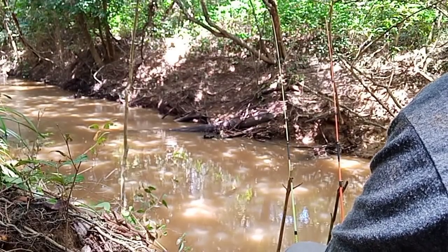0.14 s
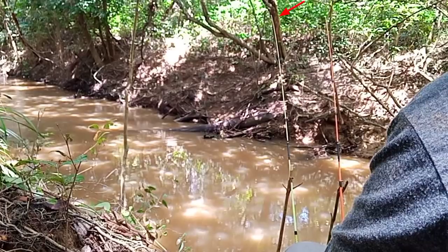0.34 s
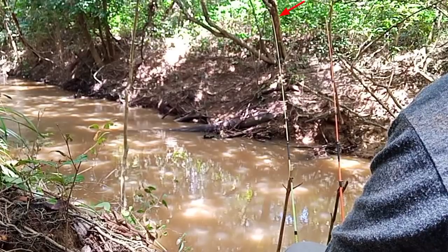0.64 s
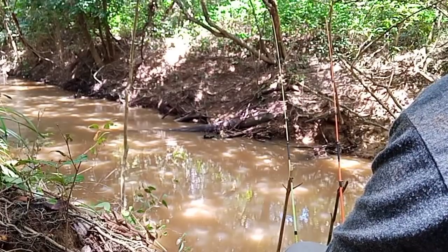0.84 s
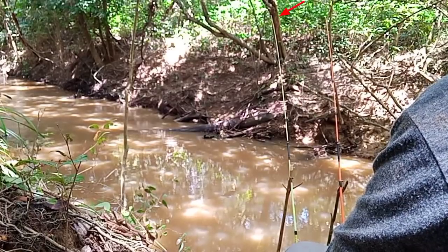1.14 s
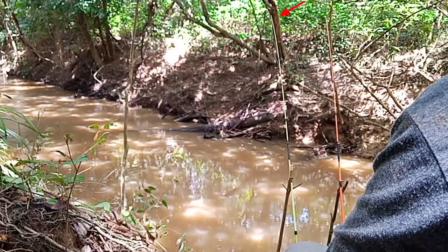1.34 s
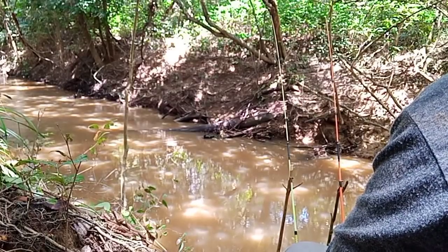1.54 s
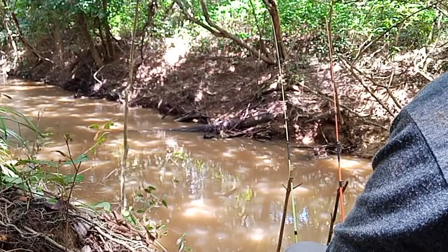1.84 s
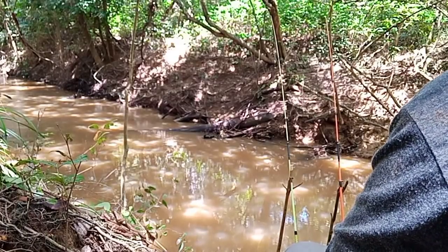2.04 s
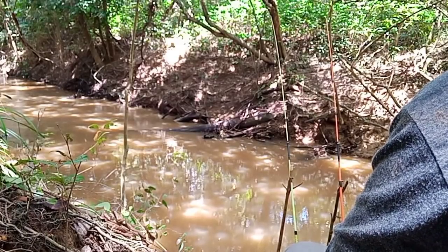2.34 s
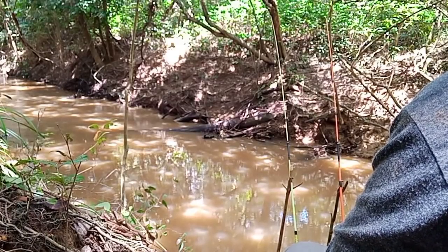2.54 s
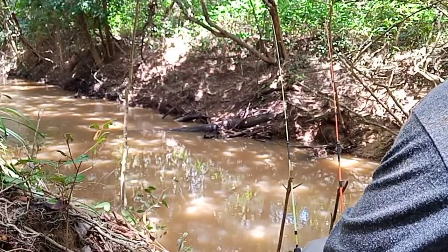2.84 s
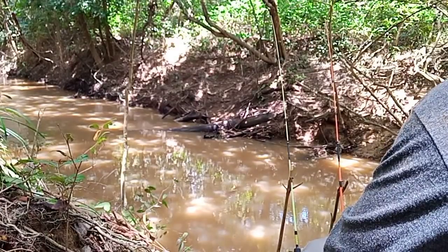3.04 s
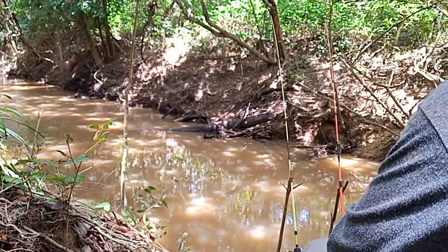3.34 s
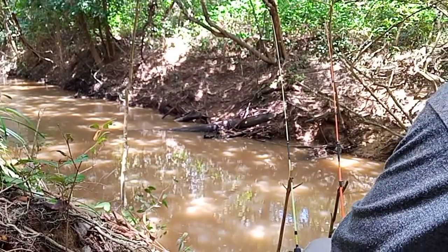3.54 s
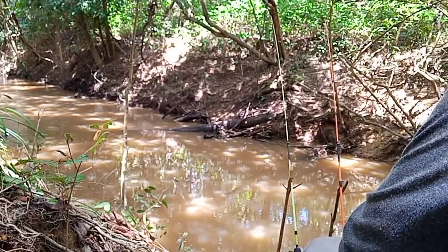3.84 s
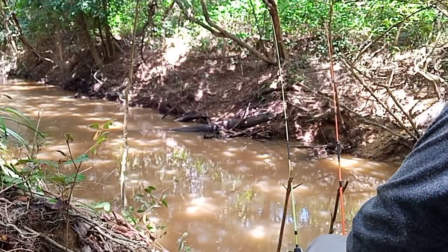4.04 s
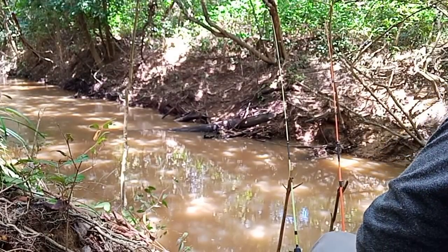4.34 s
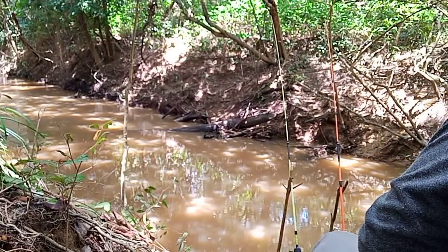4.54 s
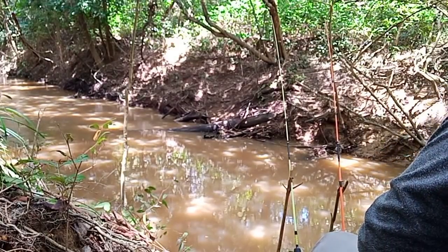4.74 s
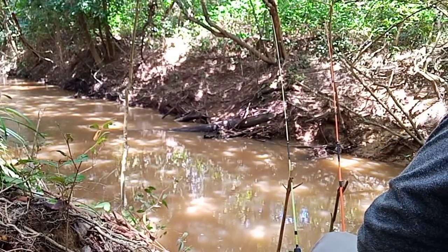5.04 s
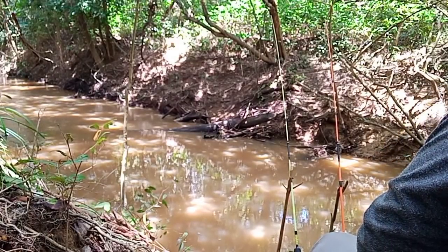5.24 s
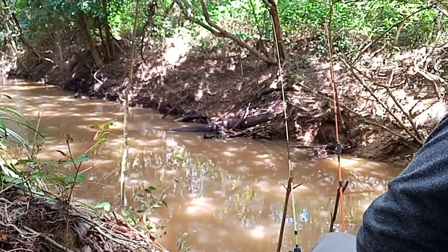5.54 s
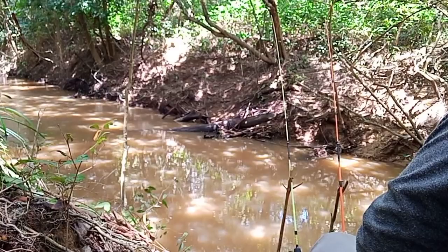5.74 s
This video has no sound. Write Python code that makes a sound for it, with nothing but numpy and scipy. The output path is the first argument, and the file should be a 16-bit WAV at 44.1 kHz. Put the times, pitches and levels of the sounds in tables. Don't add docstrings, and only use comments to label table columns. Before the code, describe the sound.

Dense, high-pitched cicada buzzing dominates from the start, dry and close, with a far chorus blurring behind it. The steady wall sags slightly, breaks into quick rasping bursts near the middle, passes between singers with short abruptly cut swells, then settles into an unbroken shrill drone to the end. Barely audible water hiss, small drips and one twig click. Mono outdoor camera sound beneath trees.

```python
import sys
import numpy as np
from scipy import signal
from scipy.fft import rfft, irfft, next_fast_len
from scipy.io import wavfile
from scipy.ndimage import uniform_filter1d, map_coordinates

SR = 44100
rng = np.random.default_rng(int(sys.argv[2]) if len(sys.argv) > 2 else 0)


def amplitude_ratio(level_db):
    exponent = np.asarray(level_db, float) / 20
    return 10 ** exponent


def waveform_to_disk(signal):
    frames = np.transpose(np.atleast_2d(signal))
    scaled = np.clip(frames, -1, 1) * 32767
    samples = np.round(scaled).astype(np.int16)
    wavfile.write(sys.argv[1], SR, samples)


N = 259308

# frequency in Hz, gain in dB per Hz.
BELLIES = [
    [(1530, -71), (2600, -26.5), (2700, -25), (2910, -14), (2990, -2), (3330, -1.5), (3840, -10.5),
     (4490, -31.5), (4770, -28), (5100, -28), (6630, -60), (11200, -120)],
    [(1530, -60), (2600, -25.5), (3180, -7.5), (3220, 6), (3330, 2), (3460, 4), (3810, -20.5),
     (4070, -30.5), (4810, -24), (5100, -26), (6630, -51), (11200, -120)],
    [(1530, -66), (2600, -27), (2840, -29), (2930, -6), (3330, 3), (3420, 0), (3810, -5), (4260, -17.5),
     (4610, -22), (5100, -32.5), (6630, -67), (11200, -120)],
]
# frequency in Hz, gain in dB per Hz.
RINGS_FIRST = [
    [(8000, -2), (8400, -6), (8800, -3), (9200, -3), (9600, 0), (9900, -5), (10200, -8), (10600, -12),
     (11000, -15), (11300, -14)],
    [(10800, -28), (11200, -30), (11500, -27), (11800, -22), (12100, -13), (12400, -6), (12600, -1),
     (12850, 0), (13100, -1), (13300, -7), (13550, -9), (13800, -11), (14000, -14)],
    [(13600, -3), (13900, -6), (14200, -5), (14500, -3), (14800, -4), (15100, -3), (15350, 0), (15500, -1)],
]
RINGS_SECOND = [
    [(8000, 0), (8400, -7), (8800, -8), (9200, -3), (9600, -7), (9900, -9), (10200, -14), (10600, -16),
     (11000, -17), (11300, -14)],
    [(10800, -26), (11200, -26), (11500, -17), (11800, -15), (12100, -11), (12400, -9), (12600, -6),
     (12850, -3), (13100, 0), (13300, -2), (13550, -8), (13800, -13), (14000, -12)],
    [(13600, -4), (13900, -7), (14200, -4), (14500, -3), (14800, 0), (15100, -1), (15350, 0), (15500, -3)],
]
RINGS_THIRD = [
    [(8000, 0), (8400, -6), (8800, -5), (9200, -3), (9600, -1), (9900, -1), (10200, -10), (10600, -9),
     (11000, -13), (11300, -13)],
    [(10800, -30), (11200, -32), (11500, -29), (11800, -26), (12100, -19), (12400, -15), (12600, -5),
     (12850, -3), (13100, 0), (13300, -5), (13550, -7), (13800, -10), (14000, -12)],
    [(13600, -3), (13900, -7), (14200, -5), (14500, -2), (14800, 0), (15100, -7), (15350, -5), (15500, -6)],
]
RINGS = [RINGS_FIRST, RINGS_SECOND, RINGS_THIRD]
EDGES_HZ = (8300, 11000, 13800, 17000)
# frequency in Hz, width in Hz, height over the colour in dB.
LINES_OF = [
    [(3100, 25, 4), (3240, 20, 4), (3330, 30, 5), (8800, 22, 9), (9165, 25, 5), (9630, 30, 6),
     (12550, 25, 5), (12750, 25, 4), (12865, 20, 4), (12960, 30, 6), (13180, 25, 5), (15417, 25, 8)],
    [(3310, 40, 5), (9200, 60, 4), (11600, 200, 3), (12230, 40, 3), (13100, 80, 3), (15417, 25, 6)],
    [(3025, 25, 4), (3316, 25, 6), (3552, 25, 4), (4200, 60, 3), (9830, 60, 8), (12230, 30, 7),
     (12660, 25, 6), (13070, 40, 6), (14350, 30, 4), (14825, 25, 5), (15417, 25, 7)],
]
# clicks per second, throbs per second, throb depth in dB, left-right unevenness in dB.
BEATS = [
    (187.6, 27, 1, -1.2),
    (226.7, 36, 1.1, 1),
    (238.8, 21, 0, 0.45),
]
# belly, third ring, fourth ring and top ring, all in dB.
VOICES = [
    (-43, -41.5, -26, -30),
    (-48.5, -47, -35, -36),
    (-39.5, -40.5, -25, -26.5),
]
# start in seconds, end in seconds, level at start and at end in dB.
PHRASES = [
    [(-.2, 2.56, 1.6, -1.6), (2.56, 2.81, -0.8, -3)],
    [(-.2, 2.6, -3, -11), (2.6, 2.99, -5, -1.5), (2.99, 3.93, 1, 1)],
    [(-.2, 2.6, -6, -13), (2.79, 3.3, -12, -13), (3.3, 3.9, -13, -6), (3.9, 5.05, -4.5, 0),
     (5.05, 6.2, 0, 0)],
]
# peak in seconds, build-up in seconds, level in dB.
SURGES = [
    [(3.17, 0.028, 0.5), (3.61, 0.066, 1), (4.02, 0.063, -3)],
    [(3.14, 0.045, -6), (3.5, .06, -8)],
    [(3.15, 0.036, -8), (3.49, .05, -15), (4.055, 0.093, -2.5), (4.42, 0.11, -0.5)],
]
SURGE_RINGS_DB = (-3, -7, -2.5, -3)
RINGS_FOLLOW = (0.96, 0.68, 1.03, 1.8)


def singers():
    out = np.zeros(N)
    gains = [stutter(), 1, 1]
    insects = zip(VOICES, PHRASES, SURGES, gains, BEATS, BELLIES, RINGS, LINES_OF)
    for voice, phrases, surges, gain, beat, belly, rings, lines in insects:
        drive = foliage(tymbals(*beat), wet_db=-10, t60=.15)
        upper = [ring(points, low, high, lines) for points, low, high in zip(rings, EDGES_HZ, EDGES_HZ[1:])]
        bands = filtered(drive, ring(belly, 2530, 5400, lines), *upper)
        held_power = held(phrases) ** np.reshape(RINGS_FOLLOW, (-1, 1))
        surge_power = np.outer(amplitude_ratio(SURGE_RINGS_DB) ** 2, surging(surges))
        level = amplitude_ratio(voice)[:, None] * np.sqrt(held_power + surge_power)
        out += gain * np.sum(level * bands, axis=0)
    return out


def tymbals(rate, throb, throb_db, uneven_db, drift=.012, sharp=0.4, clean=0.06):
    wander = wobble(5)
    cycle = np.cumsum(rate * (1 + drift * wander)) / SR
    clicks = np.diff(np.floor(cycle), prepend=0) * np.sqrt(SR / rate)
    rattle = rng.standard_normal(N) * np.exp(sharp * (.5 - cycle % 1))
    beat = np.cumsum(throb * (1 + 0.055 * wander)) / SR
    side = np.sign(cycle % 2 - 1)
    strength_db = uneven_db * side + throb_db * np.sin(2 * np.pi * beat)
    return (clean * clicks + rattle) * amplitude_ratio(strength_db)


def held(phrases):
    t = np.arange(N) / SR
    edge_s = 0.018
    power = np.zeros(N)
    for start, end, start_db, end_db in phrases:
        level_db = np.interp(t, (start, end), (start_db, end_db))
        power += amplitude_ratio(2 * level_db) * step(t, start, edge_s) * (1 - step(t, end, edge_s))
    return power


def surging(surges):
    t = np.arange(N) / SR
    power = np.zeros(N)
    for peak, rise, db in surges:
        width = rise * np.where(t > peak, 0.24, 1)
        power += amplitude_ratio(2 * db) * np.exp(-((t - peak) / width) ** 2)
    return power


# start in seconds, bursts per second, depth in dB, time of a burst in seconds.
STUTTER = (2.595, 25, 3.1, 2.642)


def stutter():
    t = np.arange(N) / SR
    start, rate, depth_db, peak = STUTTER
    song_end = PHRASES[0][-1][1]
    dip_db = depth_db * (np.cos(2 * np.pi * rate * (t - peak)) - 1)
    return amplitude_ratio(dip_db * step(t, start, 0.0092) * (t < song_end + .1))


# frequency in Hz, gain in dB per Hz.
DRONE = [(3030, -70), (5150, -44.5), (5820, -15), (6190, -2), (6470, 1.5), (7310, -3), (8390, -21.5),
         (9000, -32), (11700, -50), (19800, -120)]
# centre in seconds, half width in seconds, depth in dB.
LULLS = [(2.63, 0.024, -2), (3.85, .05, -0.1), (4.25, .035, -1.5), (5.9, 0.018, -3)]


def chorus(count=4):
    crowd = np.zeros(N)
    for rate, throb in rng.uniform((150, 15), (260, 35), (count, 2)):
        crowd += tymbals(rate, throb, 0.75, 1.0, clean=0.044)
    far = foliage(crowd, wet_db=-13.0, t60=0.041)
    drone, deeper = filtered(far, ring(DRONE, 5170, EDGES_HZ[0]), ring(DRONE, 5190, 6010))
    thins = step(np.arange(N) / SR, 2.59, .03)
    level_db = -24 - 1.98 * thins + bumps(LULLS) + 0.46 * wobble(8)
    return amplitude_ratio(level_db) * (drone + thins * amplitude_ratio(-24) * deeper)


# start in seconds, peak in dB, frequency in Hz, 60 dB decay in seconds.
DRIPS = [(.145, -62, 1180, .04), (.16, -55, 590, .07), (.235, -54, 1850, .1), (.42, -52, 580, .07),
         (.44, -60, 1450, .06), (.49, -56, 570, .06), (.745, -56, 640, .06), (2.648, -52, 300, .04),
         (2.66, -51, 220, .05), (2.658, -55, 1000, .06), (2.68, -59, 1020, .05), (2.815, -55, 220, .04),
         (3.778, -56, 330, .08), (3.797, -54, 340, .06), (3.9, -59, 170, .05), (3.931, -52, 430, .03),
         (3.942, -53, 280, .035), (4.13, -62, 1400, .04), (4.914, -44, 4450, .02), (4.914, -44, 4850, .02),
         (4.914, -43, 5250, .02), (4.914, -61, 1500, .03)]
# start in seconds, peak in dB.
TICKS = [
    (3.922, -29),
    (3.936, -65),
]
# frequency in Hz, level in dB, 60 dB decay in seconds.
TWIG = [(200, -15, .04), (660, -3, .026), (1390, 0, .023), (1560, -1, .02), (2100, -2, .013),
        (4700, -4, .012)]


def small_sounds():
    track = np.zeros(N + SR)
    for s, db, hz, t60 in DRIPS:
        add_mode(track, s, db, hz, t60, attack=t60 / 20)
    for s, db in TICKS:
        for hz, level_db, t60 in TWIG:
            add_mode(track, s, db + level_db - 2, hz, t60, attack=0.0019)
    return track[:N]


def add_mode(track, s, db, hz, t60, attack):
    t = np.arange(SR // 8) / SR
    envelope = amplitude_ratio(db - 60 * t / t60) * (1 - np.exp(-t / attack))
    track[round(s * SR):][:len(t)] += envelope * np.sin(2 * np.pi * hz * t)


# frequency in Hz, gain in dB per Hz.
HISS = [(12, -27), (20, 16), (22, -15), (138, -4), (266, -8.5), (306, -9.5), (706, -11), (1110, -13),
        (2160, -12), (2600, 3.5), (3380, -36), (5720, -120)]


def hiss():
    colour = HISS[:-3] + [(2450, -11), (2620, -17), (3500, -15), (6000, -15), (16000, -30)]
    bed, = filtered(rng.standard_normal(N), lambda hz: along(colour, hz))
    uneven = rng.standard_normal(N) * amplitude_ratio(2 * wobble(9.6))
    lumps, = filtered(uneven, ring([(100, 0)], 80, 340))
    floor_db = -64.5 - .15 * np.arange(N) / SR
    return amplitude_ratio(floor_db) * (bed + amplitude_ratio(-14) * lumps)


def foliage(x, wet_db, t60):
    t = np.arange(SR // 5) / SR
    tail = rng.standard_normal(len(t)) * amplitude_ratio(-60 * t / t60)
    return x + amplitude_ratio(wet_db) * signal.fftconvolve(x, tail / np.linalg.norm(tail))[:N]


def ring(points, low, high, lines=()):
    def response(hz):
        sharp_db = sum(db / (1 + ((hz - centre) / width) ** 2) for centre, width, db in lines)
        band = step(hz, low, 150) * (1 - step(hz, high, 150))
        return along(points, hz) * amplitude_ratio(sharp_db) * band
    return response


def filtered(x, *responses):
    m = next_fast_len(N + 8192)
    spectrum, hz = rfft(x, m), np.fft.rfftfreq(m, 1 / SR)
    return [unit(irfft(spectrum * response(hz), m)[:N]) for response in responses]


def unit(x):
    return x / np.sqrt(np.mean(x ** 2) + 1e-20)


def along(points, hz):
    f, db = np.transpose(points)
    return amplitude_ratio(np.interp(np.log(hz + 1), np.log(f + 1), db))


def wobble(rate):
    knots = rng.standard_normal(int(N * rate / SR) + 4)
    return map_coordinates(knots, [np.arange(N) * rate / SR])


def step(v, edge, width):
    return .5 + .5 * np.tanh((v - edge) / width)


def bumps(rows):
    t = np.arange(N) / SR
    return sum(size * np.exp(-((t - s) / width) ** 2) for s, width, size in rows)


def scene():
    return np.tile(singers() + chorus() + hiss() + small_sounds(), (2, 1))


# frequency in Hz, level in dB per bin.
MASKED = [(400, -113), (900, -98), (2200, -96.5), (2620, -90.5), (3000, -93), (4500, -91), (4850, -88.5),
          (5150, -88), (6000, -103)]


def without_masked(x):
    hz, _, z = signal.stft(x, SR, nperseg=2048)
    power = uniform_filter1d(uniform_filter1d(np.abs(z) ** 2, size=3, axis=0), size=2, axis=1)
    frame = np.minimum(np.arange(z.shape[1]), N // 1024)
    demand = amplitude_ratio(2.2 * wobble(12)[::1024][frame])
    log_power = np.log(power + 1e-20)
    usual = np.exp(uniform_filter1d(uniform_filter1d(log_power, size=15, axis=0), size=31, axis=1))
    follows = (usual / np.median(usual, axis=1, keepdims=True).clip(1e-20)) ** .9
    threshold = follows * (along(MASKED, hz)[:, None] * demand) ** 2
    kept = np.where(power > threshold, 1, .03) * (hz < 15490)[:, None]
    return signal.istft(z * kept, SR, nperseg=2048)[1][:N]


def band_limit(x):
    return signal.sosfilt(signal.butter(12, 15650, fs=SR, output="sos"), x)


def record(dry):
    duck = amplitude_ratio(bumps([(2.76, 0.048, -3.5)]))
    mix = np.tile(duck * without_masked(dry[0]), (2, 1))
    return band_limit(mix)


dry = scene()
out = record(dry)
waveform_to_disk(out)
```